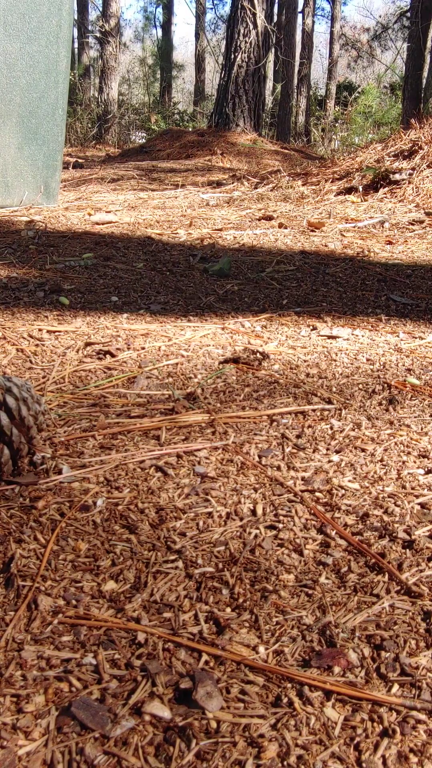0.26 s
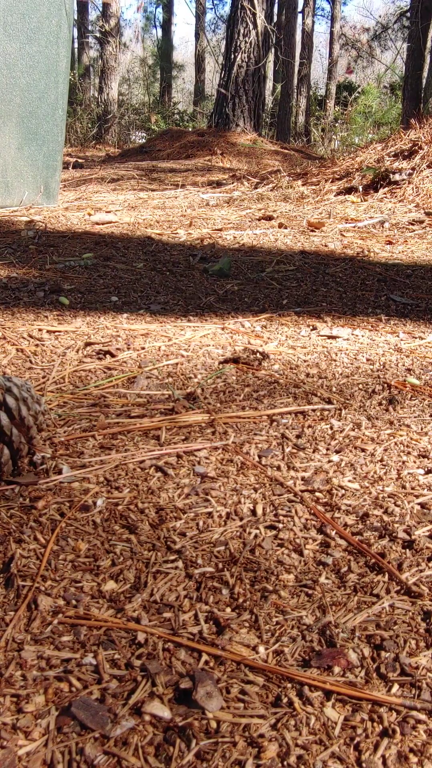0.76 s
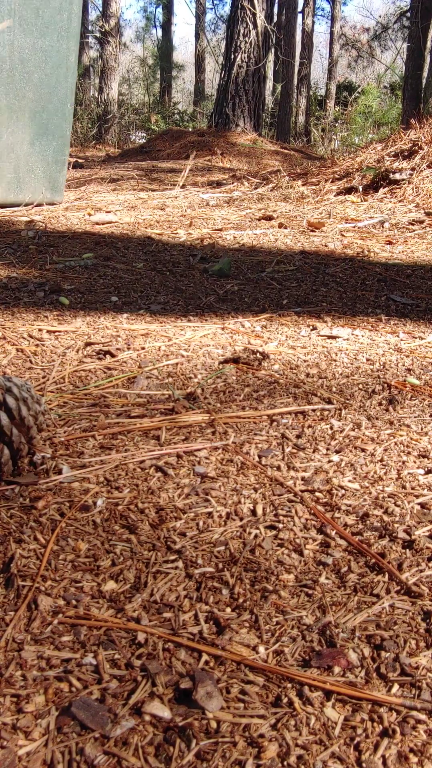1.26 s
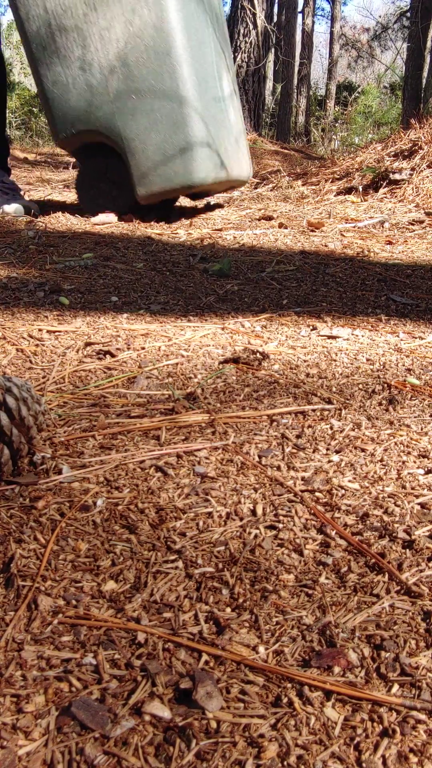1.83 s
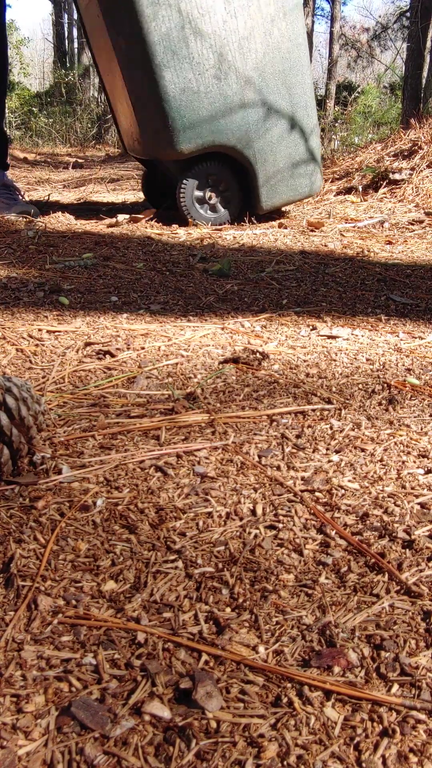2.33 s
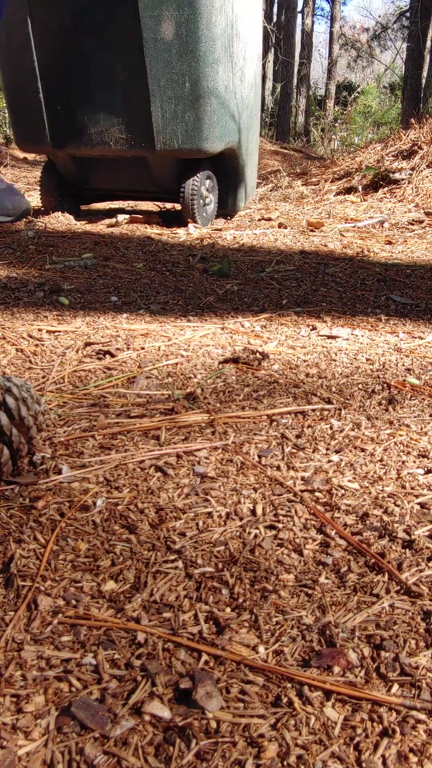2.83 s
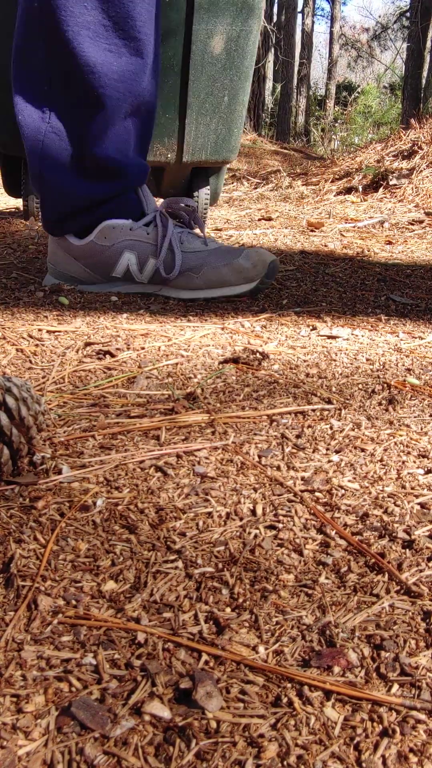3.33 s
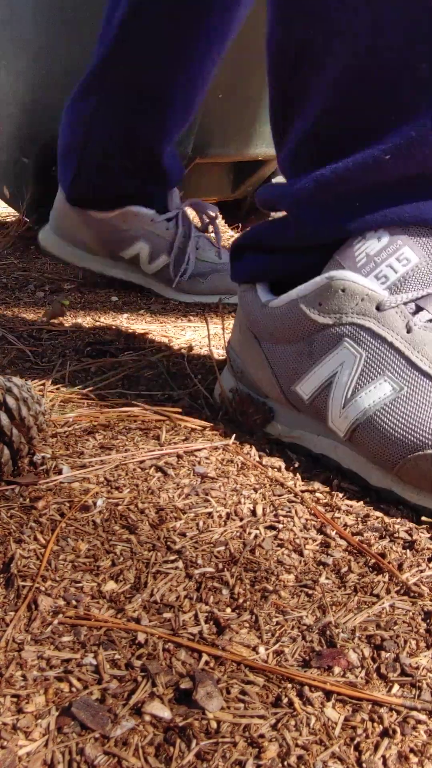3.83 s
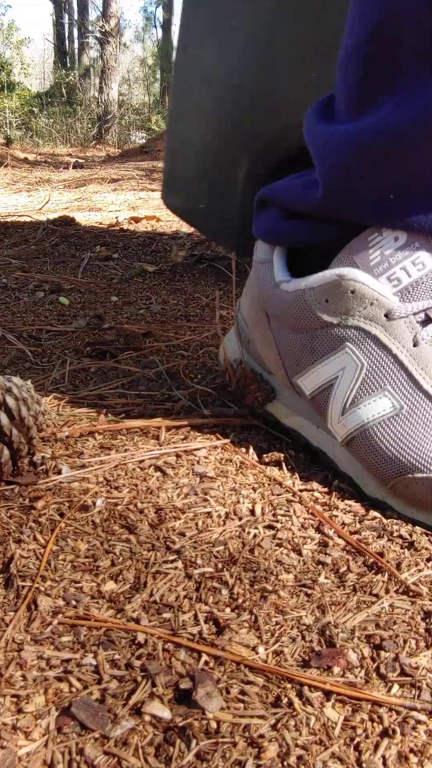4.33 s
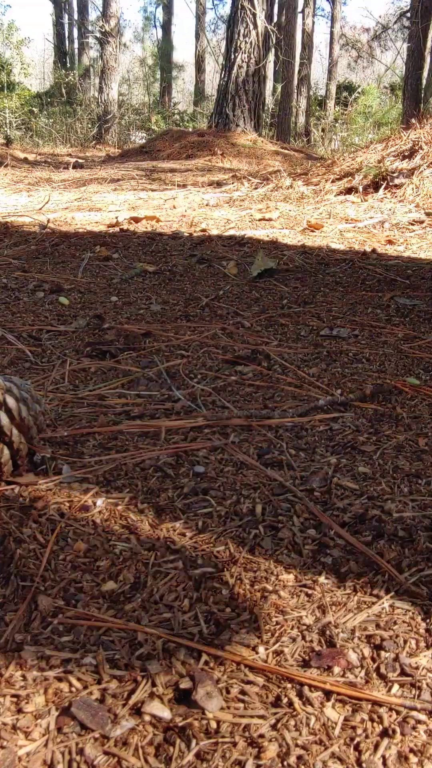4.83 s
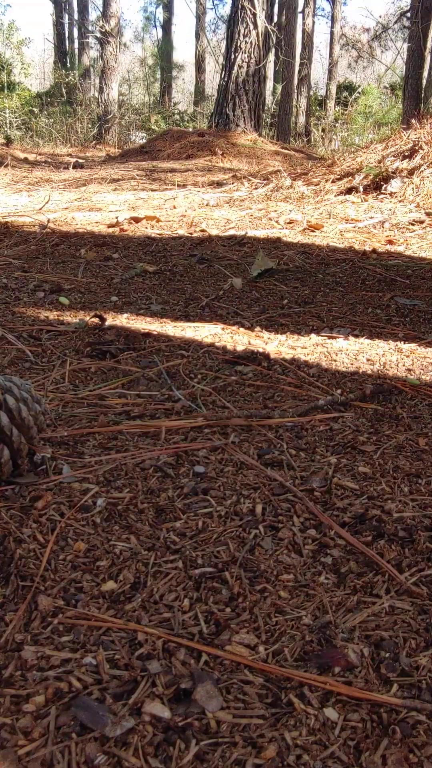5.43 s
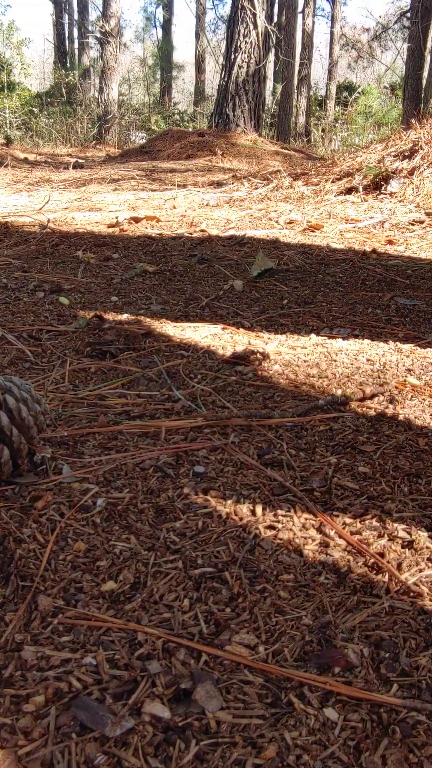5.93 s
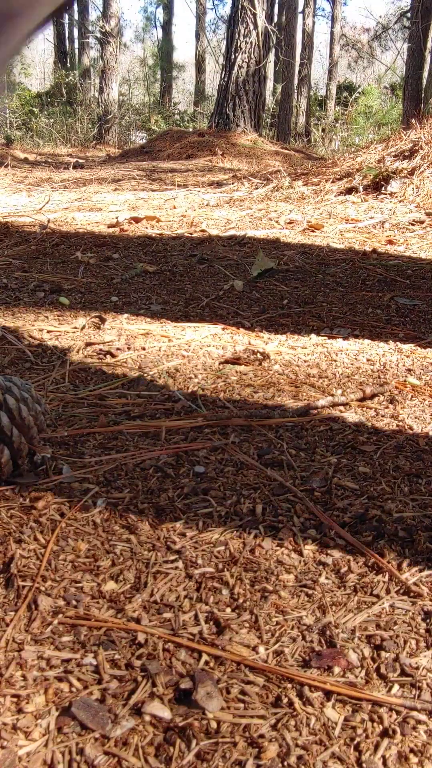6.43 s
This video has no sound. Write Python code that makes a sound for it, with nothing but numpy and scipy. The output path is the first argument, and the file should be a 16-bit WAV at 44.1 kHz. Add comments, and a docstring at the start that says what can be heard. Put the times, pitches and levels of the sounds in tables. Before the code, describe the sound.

Close ground-level stereo pickup in quiet woods: a hollow plastic bin jolts, scrapes and rumbles over pine litter, first soft, then harder. Footsteps crunch dry chips and needles nearer and nearer, with sharp little twig clicks. A very heavy, drum-like bump is followed by a tiny rising squeak and another solid thump. Movement dies down to faint stirring, low wind buffeting on the left, and a trace of distant high whistling.

```python
"""Dry woodland floor: someone walks and drags an empty plastic wheeled bin close to a phone on the ground.
The bin's air booms (decaying tone pairs) and its walls ring (resonators) on each bump; jolts rumble as it rolls.
Mulch and needles crunch (clumped grains plus noise), twigs snap (short noise clicks), a joint squeaks once.
Behind: wind puffs on the left microphone port (low noise), faint far whistling and still air (shaped noise)."""
import sys
import numpy as np
from scipy import signal
from scipy.fft import rfft, irfft
from scipy.io import wavfile
from scipy.ndimage import map_coordinates

SR = 44100
rng = np.random.default_rng(int(sys.argv[2]) if len(sys.argv) > 2 else 0)


def master(y):
    """Save y as 16-bit WAV."""
    cut = np.clip(np.atleast_2d(y).T, -1, 1)
    pcm = np.round(cut * 32767)  # scale
    wavfile.write(sys.argv[1], SR, pcm.astype(np.int16))


N = 294672

# All level/dB columns are relative: source gains and port responses follow.


def from_db(db):
    """Decibels to amplitude ratio."""
    return 10 ** (np.asarray(db) / 20)


def rms_one(x):
    """Scale to unit RMS over all channels."""
    return x / np.sqrt(np.mean(x ** 2) + 1e-20)


def in_time(rows):
    """Interpolate each column linearly over the scene's samples."""
    t_s, *columns = np.transpose(rows)
    return [np.interp(np.arange(N) / SR, t_s, column) for column in columns]


def band(x, low_hz, high_hz, order=2):
    """Butterworth band-pass."""
    edges_hz = [low_hz, min(high_hz, 0.45 * SR)]
    return signal.sosfilt(signal.butter(order, edges_hz, "band", fs=SR, output="sos"), x)


def drift(rate_hz):
    """Slow random wander of RMS 1: noise through two equal poles, run at SR / 40."""
    step, settle = 40, 2000
    r = np.exp(-2 * np.pi * rate_hz * step / SR)
    noise = rng.standard_normal(N // step + settle + 2)
    slow = signal.lfilter([1], [1, -2 * r, r * r], noise)[settle:]
    return np.interp(np.arange(N) / step, np.arange(len(slow)), rms_one(slow))


def ring(clicks, f_hz, t60_s):
    """Two-pole resonator: a unit click starts a decaying sine of height about 1."""
    r = from_db(-60 / (t60_s * SR))
    w = 2 * np.pi * f_hz / SR
    return signal.lfilter([0, np.sin(w)], [1, -2 * r * np.cos(w), r * r], clicks + 1e-18)


def grains(per_s, spread_db, channels=1):
    """Random clicks of either sign, most small, a few large."""
    size_db = spread_db * np.minimum(rng.exponential(1, (channels, N)), 5)
    signs = rng.choice([-1, 1], (channels, N))
    return from_db(size_db) * signs * (rng.random((channels, N)) < per_s / SR)


def wide(three, share):
    """One common source in both ports plus a power share of separate sound in each."""
    return np.sqrt(1 - share) * three[0] + np.sqrt(share) * three[1:]


def bursts(t_s, levels_db, t60_s):
    """Envelope that jumps at each time and decays exponentially."""
    marks = np.zeros(N)
    marks[(np.array(t_s) * SR).astype(int)] = from_db(levels_db)
    return signal.lfilter([1], [1, -from_db(-60 / (t60_s * SR))], marks + 1e-18)


def strokes(rows, under_db, rise_db_per_s, fall_db_per_s):
    """Level curves in dB: strokes that rise, hold and fall, power-summed with a slow curve."""
    t = np.arange(0, N + 64, 64) / SR
    start_s, hold_s, *levels_db = np.transpose(rows)[:, :, None]
    rise_db = rise_db_per_s * (t - start_s)
    fall_db = fall_db_per_s * (start_s + hold_s - t)
    shape_db = np.minimum(0, np.minimum(rise_db, fall_db))
    curves_db = []
    for level_db, slow_db in zip(levels_db, under_db):
        power = np.sum(from_db(level_db + shape_db) ** 2, axis=0)
        power = np.interp(np.arange(N) / SR, t, power)
        curves_db.append(10 * np.log10(power + from_db(slow_db) ** 2))
    return curves_db


# Bumps of bin and heels: t/s, crack level/dB, boom level/dB, boom f/Hz, wall knock level/dB
BUMPS = [(0.472, -40, -29, 111.5, -30.5), (0.546, -39, -27, 116, -23), (0.601, -29.5, -14.5, 117.3, -17),
         (0.7495, -68, -32.5, 124, -39), (0.9592, -41, -18, 111.6, -23.5), (1.306, -64, -24, 106, -38),
         (1.937, -27.5, -22, 114, -10), (2.0875, -30, -29.5, 137, -19), (2.4995, -13, -6.5, 112.7, -5),
         (3.154, -60, -35.5, 111, -32), (3.69, -50, -25.5, 99, -36), (3.786, -26.5, -21.5, 151.6, -9),
         (3.812, -27, -38, 160, -19.5), (4.083, -33.5, -26, 122, -18), (4.323, -39, -20.5, 125, -21.5),
         (4.611, -52.5, -27.5, 154, -22), (5.036, -41, -33, 120, -25.5), (5.209, -9, 1.5, 124.6, -6.5),
         (5.484, -36, -35, 144, -30.5), (5.731, -14.5, -5, 116, -9), (6.673, -27.5, -29, 121, -23.5)]
BOOM_T60_S, BOOM_RISE_S, BOOM_LATE_S = 0.13, 0.018, 0.0017   # rise: time constant
BOOM_PARTNER_RATIO = 0.952


def boom():
    """Air in the bin: each bump starts a swelling, dying pair of tones, the second lower."""
    out = np.zeros(N + SR)
    t = np.arange(SR // 2) / SR
    shape = (1 - np.exp(-t / BOOM_RISE_S)) * from_db(-60 * t / BOOM_T60_S)
    for t_s, _, boom_db, f_hz, _ in BUMPS:
        pair = np.sin(2 * np.pi * f_hz * t) + 0.5 * np.sin(2 * np.pi * f_hz * BOOM_PARTNER_RATIO * t)
        out[int((t_s + BOOM_LATE_S) * SR):][:len(t)] += from_db(boom_db + 7.0) * shape * pair
    return out[:N]


# Bin rolling along, with its halts: t/s, rumble level/dB, wall scuff level/dB
ROLL = [(0.0, -57.5, -98), (0.15, -67, -64), (0.25, -43, -59.5), (0.44, -44.5, -104), (0.735, -40.5, -65),
        (1.05, -49.5, -58), (1.15, -102, -65.5), (1.3, -56, -60), (1.57, -63, -88), (1.76, -47, -58.5),
        (1.9, -37.5, -52.5), (2.24, -35, -52), (2.6, -38.5, -55), (3.56, -41.5, -59.5), (3.63, -44, -89),
        (3.95, -48, -44.5), (4.5, -43.5, -50), (4.97, -35, -41.5), (5.4, -48.5, -53), (6.0, -38, -62.5),
        (6.28, -48.5, -69), (6.58, -56, -81), (6.66, -48.5, -65)]
# Shoves of the bin: start t/s, hold/s, rumble level/dB, wall scuff level/dB
SHOVES = [(0.28, 0.044, -48, -51), (0.478, 0.13, -35.5, -37.5), (0.752, 0.16, -44, -49.5),
          (1.2, 0.059, -39, -58.5), (1.308, 0.15, -44, -49), (1.64, 0.038, -36.5, -54),
          (1.95, 0.056, -24, -38), (2.09, 0.042, -24, -41.5), (2.293, 0.055, -38.5, -40),
          (2.83, 0.24, -36, -48.5), (3.157, 0.12, -58, -42.5), (3.69, 0.1, -44, -47),
          (3.83, 0.05, -30, -37.5), (4.02, 0.24, -34.5, -45.5), (4.62, 0.18, -34, -45),
          (5.04, 0.11, -25, -32.5), (6.05, 0.1, -62, -67), (6.35, 0.12, -42, -54)]


def bin_motion_db():
    """Rumble and scuff levels: shoves on top of steady rolling."""
    return strokes(SHOVES, in_time(ROLL), rise_db_per_s=1095, fall_db_per_s=262)


SHUDDER_DB, SHUDDER_T60_S = -9.5, 0.43   # level offset from the BUMPS boom column


def rumble(rumble_db):
    """Small jolts ring the bin's air and the soil; the bin shudders on after each bump."""
    t_s, _, boom_db, *_ = np.transpose(BUMPS)
    shake = from_db(rumble_db + 0.78 * drift(2.2))
    shake += bursts(t_s, boom_db + SHUDDER_DB, SHUDDER_T60_S)
    jolts = rms_one(grains(400, 2.7, channels=3)) * shake
    air_modes = ring(jolts[0], 125.0, 0.088) + 1.71 * ring(jolts[0], 111.0, 0.099)
    ground = 2.53 * ring(wide(jolts, 0.081), 63.5, 0.05)   # the soil shakes the ports unevenly
    return from_db(-32.5) * (air_modes + ground)


# Lighter taps on the walls, too weak to boom: t/s, crack level/dB, wall knock level/dB
TAPS = [(1.468, -39, -39), (2.2905, -56, -27.5), (2.6438, -36, -28.5), (2.6828, -24, -24.5),
        (3.18, -52.5, -31), (3.248, -31, -56), (4.212, -45, -38), (4.537, -34, -31.5), (4.6, -46, -26),
        (4.727, -53, -19.5), (5.827, -15.5, -18.5), (5.944, -59, -38), (6.138, -49, -39), (6.637, -49, -42)]


def blows():
    """Time, crack and knock of all bumps and taps."""
    return np.transpose([(t_s, crack_db, knock_db) for t_s, crack_db, *_, knock_db in BUMPS + TAPS])


# Plastic wall modes: f/Hz, level/dB, t60/s
WALLS = [(174.5, -10, 0.31), (217.3, 4, 0.083), (257.4, 1.5, 0.1246), (313.2, -3.5, 0.072),
         (372.6, -8.5, 0.16), (440, -2.5, 0.038), (674, -11, 0.031), (871, -2.5, 0.013), (1020, -5, 0.011),
         (1264, -7, 0.015), (1370, -8, 0.0056)]
# Wall sound dulls as the bin moves behind the phone: t/s, tilt/(dB per octave)
TILT = [(3.2, 4), (5.4, -0.1)]
SCUFF_TILT_DB_PER_OCT = -2.5   # soft contact excites high modes less than a knock


def walls(scuff_db):
    """Bumps, and the scuffing of wheels and base, strike the same wall modes."""
    t_s, _, knock_db = blows()
    push = from_db(scuff_db + 1.5 * drift(30))
    push += bursts(t_s, knock_db - 12.0, 0.082)   # each blow rattles on briefly
    scuff = rms_one(grains(2600, 2.33, channels=3)) * push
    out = from_db(-12.0) * band(wide(scuff, 0.37), 200, 600, order=1)
    uneven_db = rng.normal(0, 2.2, (len(t_s), len(WALLS)))
    tilt_db_per_oct = in_time(TILT)[0]
    for k, (f_hz, level_db, t60_s) in enumerate(WALLS):
        octaves = np.log2(f_hz / 400)
        contact_db = -29.0 + 4.46 * drift(16.3) + 3.35 * drift(2.73)   # contact point wanders
        delayed = np.pad(scuff[0], (rng.integers(0, 300), 0))[:N]
        clicks = from_db(contact_db + SCUFF_TILT_DB_PER_OCT * octaves) * delayed
        knocks = from_db(knock_db - 14.0 + uneven_db[:, k])
        clicks[(t_s * SR).astype(int)] += (-1) ** k * knocks
        out += from_db(level_db + tilt_db_per_oct * octaves) * ring(clicks, f_hz, t60_s)
    return out


def cracks():
    """Each blow starts with a hard click and a noise spray of debris that dies fast."""
    t_s, crack_db, _ = blows()
    click = bursts(t_s, crack_db - 8.5, 0.0078)
    spray = bursts(t_s, crack_db - 7.5, 0.013) + bursts(t_s, crack_db - 9, 0.079)
    return band(click + rng.standard_normal((2, N)) * spray, 1200, 3040, order=1)


SQUEAK_S, SQUEAK_HOLD_S, SQUEAK_DB = 5.262, 0.05, -46
SQUEAK_LOW_HZ, SQUEAK_HIGH_HZ, SQUEAK_HZ_PER_S = 1230, 1430, 3200   # centre of the wavering pitch


def squeak():
    """A slipping plastic joint: a rising, wavering sine, weaker on the right."""
    t = np.arange(N) / SR - SQUEAK_S
    level_db, = strokes([(SQUEAK_S, SQUEAK_HOLD_S, SQUEAK_DB)], [-200], 1200, 330)
    f_hz = np.clip(SQUEAK_LOW_HZ + SQUEAK_HZ_PER_S * t, SQUEAK_LOW_HZ, SQUEAK_HIGH_HZ)
    phase = 2 * np.pi * np.cumsum(f_hz * (1 + 0.04 * drift(120))) / SR
    return from_db(level_db + 5.5 * drift(50)) * np.sin(phase) * [[1.0], [0.3]]


# Litter stirring between steps, louder as the walker comes near: t/s, mulch level/dB, needles level/dB
STIR = [(0.0, -87, -84), (0.67, -82, -70), (1.77, -72.5, -73.5), (2.1, -68, -63.5), (2.86, -62, -60.5),
        (3.64, -67.5, -69), (4.04, -56.5, -56.5), (4.93, -49, -52), (5.12, -41, -53.5), (5.28, -54.5, -63),
        (5.53, -59, -64.5), (5.73, -55.5, -58), (5.86, -62, -65.5), (6.68, -67, -74)]
# Crunches under soles and wheels: start t/s, hold/s, mulch level/dB, needles level/dB
CRUNCHES = [(0.155, 0.22, -74.5, -72.5), (0.46, 0.19, -65, -62.5), (1.37, 0.11, -63, -72),
            (1.865, 0.0069, -67, -60.5), (1.93, 0.14, -52.5, -56), (2.09, 0.074, -63, -64),
            (2.28, 0.052, -55, -58.5), (2.64, 0.088, -55.5, -80), (2.88, 0.04, -51.5, -54.5),
            (2.975, 0.036, -74, -50.5), (3.07, 0.0056, -58.5, -58), (3.16, 0.15, -58.5, -63),
            (3.5, 0.059, -60.5, -60), (3.685, 0.17, -73, -60), (3.785, 0.11, -45, -55.5),
            (4.06, 0.029, -67, -55.5), (4.15, 0.027, -51, -49), (4.212, 0.017, -42.5, -50),
            (4.635, 0.15, -43.5, -49.5), (4.77, 0.092, -48.5, -49), (4.94, 0.015, -40.5, -46),
            (5.068, 0.031, -34.5, -40), (5.12, 0.033, -40, -57), (5.55, 0.14, -54, -58),
            (5.81, 0.057, -48, -50.5), (6.05, 0.14, -55.5, -57.5)]


def litter_db():
    """Mulch and needle levels: crunches on top of slow stirring."""
    return strokes(CRUNCHES, in_time(STIR), rise_db_per_s=1207, fall_db_per_s=498)


def mulch(mulch_db):
    """Chips break in clumps, each ringing 16 cycles to -60 dB at its own pitch, over a dry swish."""
    breaks = grains(1400 * from_db(7 * drift(23)), 4.0, channels=2)
    dealt = rng.integers(0, 10, (2, N))   # which pitch each break gets
    chips = np.zeros((2, N))
    for k, f_hz in enumerate(np.geomspace(1500, 5200, 10)):
        level_db = -3.0 * np.log2(f_hz / 900) + 4.0 * drift(5.0)
        chips += from_db(level_db) * ring(breaks * (dealt == k), f_hz, 16.0 / f_hz)
    chips = rms_one(chips[0] + 0.9 * chips[1] * [[1], [-1]])   # mid and side to left and right
    swish = rms_one(band(wide(rng.standard_normal((3, N)), 0.45), 730, 3750))
    swish = swish * from_db(1.25 * drift(5.8))
    return from_db(mulch_db + 3.0 + 2.65 * drift(20)) * (0.39 * chips + 0.36 * swish)


def needles(needle_db):
    """Fine bright breaks in clumps over a hiss, separate in each port."""
    breaks = rms_one(grains(600 * from_db(7 * drift(30)), 5.0, channels=2))
    mix = 0.45 * breaks + 0.56 * rng.standard_normal((2, N))
    return from_db(9.5) * band(mix * from_db(needle_db + 2.0 * drift(21)), 4300, 21000, order=3)


# Twigs: t/s, level/dB
SNAPS = [(0.549, -39), (0.604, -45), (0.657, -48), (1.9386, -38), (2.3042, -39), (2.424, -44.5),
         (3.689, -49.5), (3.816, -33.5), (3.961, -44), (4.035, -50), (4.149, -41), (4.167, -39),
         (4.228, -35.5), (4.286, -38.5), (4.382, -37.5), (4.452, -42), (4.492, -34.5), (4.572, -30),
         (4.635, -51), (4.785, -39), (4.81, -28), (4.92, -31), (5.07, -39), (5.8271, -24.5), (6.069, -41),
         (6.4446, -41.5), (6.4654, -33)]


def snaps():
    """Each twig: a noise click a few ms long with a short ring at its own pitch."""
    out = np.zeros(N + SR)
    t = np.arange(400) / SR
    fade = np.exp(-t / 0.0011)
    for t_s, level_db in SNAPS:
        f_hz = 2000 * 2 ** rng.uniform(0, 1.83)
        snap = rng.standard_normal(len(t)) + 0.6 * np.sin(2 * np.pi * f_hz * t)
        out[int(t_s * SR):][:len(t)] += from_db(level_db + 8) * snap * fade
    return band(out[:N], 2850, 18000, order=1)


# Puffs of wind: start t/s, hold/s, level/dB
GUSTS = [(3.2, 0.17, -34.5), (5.675, 0.0042, -21), (6.11, 0.085, -26), (6.35, 0.14, -31)]


def gusts():
    """Wind at the left port only: lumpy low noise."""
    level_db, = strokes(GUSTS, [-200], 700, 350)
    puff = rms_one(band(rng.standard_normal(N), 45, 63.6))
    return from_db(level_db + 3.4 * drift(49)) * puff * [[1], [0]]


# Faint high whistling far away: t/s, level/dB
WHISTLE = [(6.4, -100), (6.52, -74), (6.68, -57)]
# Its bands: centre f/Hz, width/Hz, level/dB
WHISTLE_BANDS = [(2860, 170, -7), (7760, 350, -17)]


def whistle():
    """Noise through narrow band-pass filters."""
    tones = np.zeros((2, N))
    for f_hz, width_hz, level_db in WHISTLE_BANDS:
        noise = band(rng.standard_normal((2, N)), f_hz - width_hz / 2, f_hz + width_hz / 2)
        tones += from_db(level_db) * rms_one(noise)
    return from_db(in_time(WHISTLE)[0]) * tones


# Colour of the still woods: f/Hz, relative density level/dB
AIR = [(18, -41), (30, -8), (138, -25), (189, -15), (10500, -38.5), (12500, -11.5), (15600, -20)]
AIR_RMS_DB = -70.5   # ahead of the ports


def air():
    """Steady low floor: noise shaped in the spectrum."""
    f_hz = np.fft.rfftfreq(N, 1 / SR) + 1
    point_hz, point_db = np.transpose(AIR)
    colour = from_db(np.interp(np.log(f_hz), np.log(point_hz), point_db))
    noise = wide(rng.standard_normal((3, N)), 0.59)
    return from_db(AIR_RMS_DB) * rms_one(irfft(rfft(noise) * colour, N))


def scene():
    """Sum of bin, litter and background at the two ports."""
    rumble_db, scuff_db = bin_motion_db()
    mulch_db, needle_db = litter_db()
    wheeled_bin = boom() + rumble(rumble_db) + walls(scuff_db) + cracks() + squeak()
    litter = mulch(mulch_db) + needles(needle_db) + snaps()
    return wheeled_bin + litter + gusts() + whistle() + air()


# Responses of the two microphone ports: f/Hz, left level/dB, right level/dB
PORTS = [(29, -19, -18), (95, -2, -3.5), (321, 0.5, 2), (554, 7.5, 12), (1092, 2.5, 12), (1574, 0, -1),
         (2300, 9.5, -2.5), (3220, -0.5, -3.5), (4280, 0, -4), (5910, -4, -6.5), (6170, 4.5, -17),
         (6950, 7.5, -16), (7270, -6, -1.5), (9200, -1, -15.5), (11230, -16, -23), (12030, -2.5, -8),
         (15500, -5, -13)]


def port(column, size=4096):
    """Minimum-phase impulse response of one port, by folding the cepstrum."""
    f_hz = np.fft.rfftfreq(size, 1 / SR)
    table = np.array(PORTS)
    level_db = np.interp(np.log(f_hz + 1), np.log(table[:, 0]), table[:, column])
    cepstrum = irfft(np.log(from_db(level_db)), size)
    cepstrum[1:size // 2] *= 2
    cepstrum[size // 2 + 1:] = 0
    return irfft(np.exp(rfft(cepstrum)), size)[:size // 2]


RIGHT_LAG_S = 0.00028   # extra travel time to the right port
CEILING, STOP_HZ = 0.8, 16900   # tanh asymptote; stop-band edge


def record(dry):
    """Delay the right port, colour both, round the peaks, cut the top."""
    late = map_coordinates(dry[1], [np.arange(N) - RIGHT_LAG_S * SR], order=3, mode="nearest")
    responses = [port(column=1), port(column=2)]
    heard = signal.fftconvolve([dry[0], late], responses, axes=1)[:, :N]
    rounded = CEILING * np.tanh(heard / CEILING)
    return signal.sosfilt(signal.cheby2(12, 70, STOP_HZ, fs=SR, output="sos"), rounded)


dry = scene()
out = record(dry)
master(out)
```